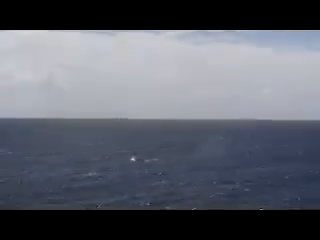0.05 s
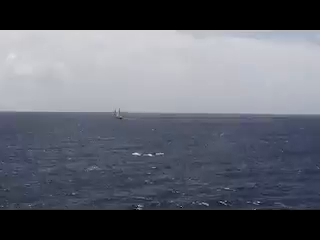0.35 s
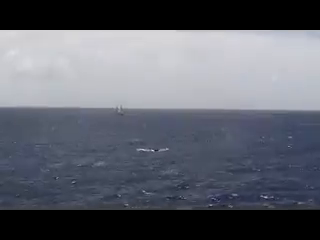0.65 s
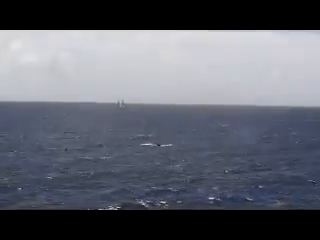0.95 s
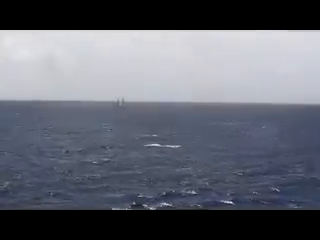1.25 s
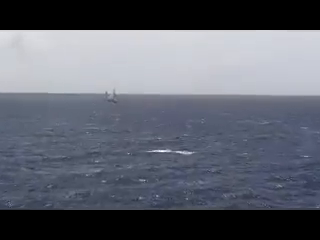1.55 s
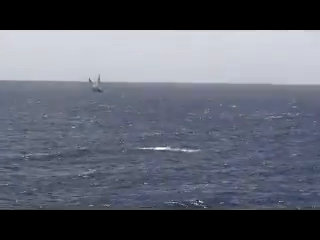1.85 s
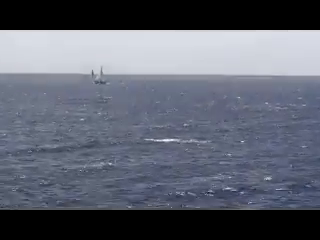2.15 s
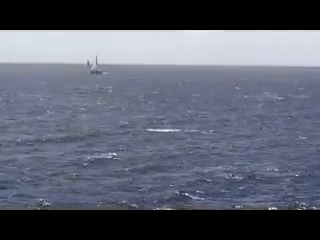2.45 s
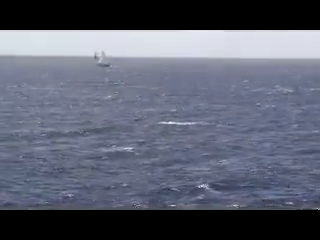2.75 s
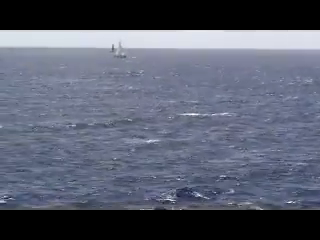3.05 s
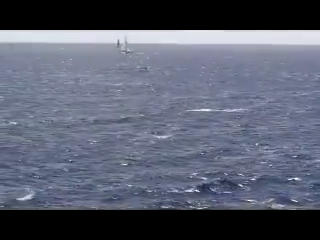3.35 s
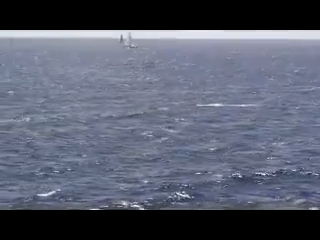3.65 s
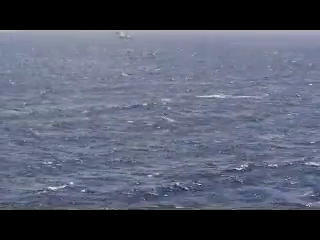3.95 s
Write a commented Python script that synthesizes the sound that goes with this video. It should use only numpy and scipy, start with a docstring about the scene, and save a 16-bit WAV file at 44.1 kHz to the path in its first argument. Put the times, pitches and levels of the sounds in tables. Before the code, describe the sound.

Gusty wind buffets the microphone with a soft rumble, sputtering rasp, crackles and occasional dull thumps. It gusts through the first second, eases around 1.3 to 2.1 seconds, then returns unevenly and crackles most from about 2.9 seconds. Far behind it are a faint sea hiss, a deep drone and tiny high camera ticks. At about 3.95 seconds a much louder, deep blast of wind hits suddenly.

```python
"""Out on open water, gusty wind buffets a camera's microphone. Eddies (small swirls of air) hit its
openings and make a soft rumble that turns into a sputtering rasp in the gusts, with spits, thumps
and crackles. Behind it the choppy sea hisses faintly over a deep drone, and something small,
probably the lens mechanism, ticks in the camera. At the very end a far stronger blast hits head-on."""
import sys
import numpy as np
from scipy import signal
from scipy.fft import rfft, irfft, next_fast_len
from scipy.io import wavfile
from scipy.ndimage import uniform_filter1d, map_coordinates

SR = 44100
rng = np.random.default_rng(int(sys.argv[2]) if len(sys.argv) > 2 else 0)


def wav_record(signal):
    """Record a signal, one row per channel, as 16-bit PCM in the file named by sys.argv[1]."""
    frames = np.transpose(np.atleast_2d(signal))
    bounded = np.clip(frames, -1, 1)
    # unit amplitude maps onto the largest positive 16-bit level
    quanta = np.round(bounded * 32767).astype(np.int16)
    wavfile.write(sys.argv[1], SR, quanta)


N = 176400  # 4 seconds

# How the wind rises and falls: time_s, rumble_db, rasp_db
GUSTS = [(0.0, -54.5, -76), (0.055, -47.5, -76), (0.07, -44.5, -66.5), (0.18, -43.5, -59.5),
         (0.21, -43, -66), (0.24, -43.5, -62), (0.59, -43, -58.5), (0.89, -46.5, -64.5), (1.04, -45, -59.5),
         (1.07, -52, -67.5), (1.16, -47.5, -60.5), (1.22, -52.5, -80), (1.3, -49, -64.5),
         (1.34, -55.5, -83), (1.4, -47, -64.5), (1.45, -61.5, -84.5), (1.49, -49, -75), (1.52, -58.5, -85),
         (1.69, -54, -83.5), (1.77, -42, -63), (1.79, -49.5, -75), (1.84, -55.5, -72.5), (1.99, -48.5, -78),
         (2.1, -52, -81), (2.16, -43, -67), (2.21, -49, -89), (2.25, -42.5, -59.5), (2.28, -47, -73.5),
         (2.36, -53.5, -69), (2.4, -52, -72.5), (2.47, -41.5, -62.5), (2.66, -53.5, -74),
         (2.7, -44.5, -62.5), (2.76, -50.5, -76.5), (2.78, -44.5, -62), (2.85, -44, -59.5),
         (3.21, -42, -59), (3.3, -47.5, -65.5), (3.32, -43, -62), (3.4, -49.5, -67.5), (3.43, -45.5, -64.5),
         (3.58, -54, -77.5), (3.62, -47, -63.5), (3.66, -52.5, -71.5), (3.7, -42, -62), (3.74, -48.5, -68),
         (3.77, -43, -61), (3.87, -44, -64.5), (3.92, -43.5, -61)]
# The tone of its low, middle and high layers: pitch_hz, level_db
RUMBLE_TONE = [(15, -7.5), (30, -11), (60, -5), (125, -1), (210, -3), (350, -6.5), (500, -13.5),
               (800, -19.5), (1500, -47.5), (4000, -84)]
FLUTTER_TONE = [(120, -35), (300, -5.5), (500, 2.5), (800, -3), (1200, -8.5), (2000, -20.5), (4000, -54),
                (9000, -69)]
RASP_TONE = [(300, -26), (800, 2.5), (1300, 4.5), (2000, 2.5), (3100, -9.5), (4600, -22), (7000, -39.5),
             (16000, -58)]
# How alike left and right sound: pitch_hz, likeness (1 the same, -1 opposite)
WIND_STEREO = [(30, 0.91), (130, 0.82), (290, 0.14), (700, -0.52), (3100, -0.28), (7000, 0.64)]
FULL_GUST_DB = -58  # gust strength is counted from this rasp level

def wind():
    """Eddies hit the microphone: stronger gusts are brighter, and the treble sputters with each eddy."""
    rumble_db, rasp_db = curves(GUSTS)
    gust_db = rasp_db - FULL_GUST_DB
    unrest = np.clip(.85 - 0.02 * gust_db, .3, 1.5)  # a stronger gust is steadier
    eddies = unit(np.tanh(1.9 * wobble(per_s=72))) * unrest
    buffets = np.tanh(wobble(per_s=48)) * unrest  # larger eddies
    sputter = wobble(per_s=330)
    rumble = even(noise(RUMBLE_TONE, WIND_STEREO), samples=1800)
    rumble *= amp(rumble_db + 2.08 + 1.3 * eddies)
    flutter_swing = amp(2.2 * eddies + 1.4 * buffets + 3.9 * sputter)
    flutter = even(flutter_swing * noise(FLUTTER_TONE, WIND_STEREO), samples=8000)
    rasp_swing = amp(eddies + 4 * sputter + 3.5 * wobble(per_s=1800))
    rasp = even(rasp_swing * noise(RASP_TONE, WIND_STEREO), samples=6000)
    flutter *= amp(FULL_GUST_DB + 11 + 0.85 * gust_db)
    rasp *= amp(FULL_GUST_DB + 1.31 * gust_db)  # grows faster than the flutter
    return rumble + flutter + rasp


# Sharp eddies hitting the microphone: peak_s, level_db
SPIT_HITS = [(0.1705, -59), (0.2185, -56), (0.3185, -47.5), (0.3368, -50), (0.415, -49.5), (0.4285, -51),
             (0.441, -51), (0.47, -51), (0.501, -47), (0.5823, -49), (0.5956, -50), (0.623, -45.5),
             (0.6435, -52.5), (0.7166, -52.5), (0.8102, -50), (0.852, -53.5), (0.9054, -50), (0.912, -54.5),
             (0.959, -52), (0.993, -51), (1.116, -54.5), (1.1504, -59), (1.3738, -65), (1.4049, -53),
             (2.263, -64), (2.891, -52.5), (2.986, -48), (2.994, -49.5), (3.014, -46.5), (3.0242, -49),
             (3.073, -53.5), (3.0812, -49.5), (3.1363, -48), (3.148, -55), (3.1875, -51), (3.217, -50.5),
             (3.2485, -51.5), (3.279, -52), (3.409, -54), (3.4344, -53.5), (3.6892, -60), (3.7027, -63),
             (3.797, -61), (3.8452, -54), (3.889, -53.5)]
# The tone of a spit, and the extra fizz of the hardest ones: pitch_hz, level_db
SPIT_TONE = [(450, -9), (1300, 4.5), (3100, -3), (4600, -17), (7000, -44), (16000, -55)]
FIZZ_TONE = [(2500, -4.5), (4500, 3), (10500, -12), (16000, -50)]

def spits():
    """Sharp eddies make short, gritty puffs, mostly in the gusts; the harder, the brighter."""
    typical_db = -50
    swell = puffs([(s, db - typical_db, 0.0066) for s, db in SPIT_HITS], rise_s=0.001)
    grit = amp(3.2 * wobble(per_s=900))
    body = even(grit * noise(SPIT_TONE, WIND_STEREO), samples=300)
    fizz = even(grit * noise(FIZZ_TONE, WIND_STEREO), samples=300)
    return amp(typical_db) * (amp(-2) * swell * body + amp(-14) * swell ** 2.4 * fizz)


def crackle():
    """Tiny eddies snap on the microphone; a stronger gust brings more and louder snaps."""
    _, rasp_db = curves(GUSTS)
    gust = amp(rasp_db - FULL_GUST_DB)
    snaps_per_s = 200 * gust ** 2
    snaps = (rng.random(N) < snaps_per_s / SR) * rng.uniform(.5, 1, N)
    age = np.arange(SR // 50) / (.00045 * SR)  # reaches 1 at the snap's peak
    swell = signal.fftconvolve(snaps, age ** 2 * np.exp(2 * (1 - age)))[:N]
    return amp(-54) * gust * swell * noise(SPIT_TONE, WIND_STEREO)


# Big eddies hitting the microphone: peak_s, level_db
THUMP_HITS = [(0.061, -42), (0.902, -39.5), (1.283, -46), (1.375, -49), (2.02, -42.5), (2.167, -47),
              (2.239, -42.5), (2.34, -42.5), (2.352, -43.5), (2.381, -53), (2.89, -41), (3.612, -52),
              (3.687, -42), (3.845, -40.5)]
# Their dull tone: pitch_hz, level_db
THUMP_TONE = [(100, -10), (220, 4), (360, 1.5), (600, -7), (1200, -21), (3000, -62)]

def thumps():
    """Big eddies land as separate dull knocks."""
    swell = puffs([(s, db, 0.013) for s, db in THUMP_HITS], rise_s=0.0031)
    return amp(2) * swell * even(noise(THUMP_TONE, WIND_STEREO), samples=400)


# The blast's heavy swings of air pressure: pitch_hz, width_hz, level_db, build_s
PRESSURE_SWINGS = [(69, 15, -10, 0.04), (132.6, 41, -15, .003), (196.6, 79, -18.5, 0.0017)]
# The tone of its deep body and of its tearing edge: pitch_hz, level_db
BLAST_TONE = [(30, 2), (95, -1), (215, -10), (310, 1), (480, -12), (900, -22.5), (1400, -26.5), (3500, -75)]
TEAR_TONE = [(500, -2), (1400, -2.5), (2800, -8), (5000, -20), (8000, -29), (15000, -36)]
# How alike left and right sound: pitch_hz, likeness
BLAST_STEREO = [(40, 0.69), (700, 0.11)]

def blast(start_s=3.9505, rise_s=0.0021, crack_s=0.00051, tear_fade_db_per_s=213):
    """Wind hits head-on: a crack, pressure swings that build and hold, and a ragged tear that fades."""
    age = np.maximum(np.arange(N) / SR - start_s, 0)
    swings = 0
    for hz, width, db, build_s in PRESSURE_SWINGS:
        band = [(hz / (1 + 2 * width / hz), -30), (hz, 0), (hz + 2 * width, -30),
                (hz + 10 * width, -120)]
        swing = even(noise(band, [(100, 0.91)]), samples=700)
        swings += amp(db) * np.minimum(age / build_s, 1) * swing
    body = amp(-16) * even(noise(BLAST_TONE, BLAST_STEREO), samples=700)
    tear = even(amp(3 * wobble(per_s=450)) * noise(TEAR_TONE, BLAST_STEREO), samples=600)
    tear *= amp(-25 - tear_fade_db_per_s * age)
    crack = puffs([(start_s + crack_s, -32, crack_s)], crack_s) * noise(TEAR_TONE, BLAST_STEREO)
    fade_in = np.clip(age / rise_s, 0, 1)
    fade_out = np.minimum(np.arange(N)[::-1] / 60, 1)  # the last 60 samples
    return crack + fade_in * fade_out * (swings + body + tear)


# Ticks inside the camera: peak_s, level_db
CAMERA_TICKS = [(1.008, -71), (1.028, -74), (1.087, -72), (1.265, -74.5), (1.763, -70), (1.888, -72),
                (2.108, -71), (2.379, -73), (2.41, -68.5), (2.552, -73), (2.618, -64.5), (2.912, -71),
                (3.091, -70), (3.329, -70), (3.498, -71), (3.58, -74), (3.679, -77)]
# The tone of their high ring: pitch_hz, level_db
RING_TONE = [(3000, -28), (7750, -23), (8150, 4), (8400, 0), (8800, -16), (11800, -17), (16000, -32)]

def ticks(ring_fade_s=0.0041, click_s=0.001, chatter_from_s=1.6):
    """A small part in the camera clicks and rings briefly; a very faint chatter joins in partway."""
    rings = puffs([(s, db - 1, ring_fade_s) for s, db in CAMERA_TICKS], rise_s=0.0014)
    clicks = puffs([(s, db - 3, click_s) for s, db in CAMERA_TICKS], rise_s=click_s)
    chatter = amp(-92) * unit(amp(8 * wobble(per_s=70))) * (np.arange(N) / SR > chatter_from_s)
    ring_noise = even(noise(RING_TONE, [(8000, 0.94)]), samples=300)
    click_noise = noise([(2000, -6), (6000, 5), (15000, -14)], [(8000, .9)])
    return (rings + chatter) * ring_noise + clicks * click_noise


# How the sea's hiss rises and falls: time_s, level_db
SEA_LEVELS = [(0, -78), (1.2, -81.5), (1.55, -80.5), (2.2, -75.5), (2.75, -76), (3.9, -81)]
# Its tone: pitch_hz, level_db
SEA_TONE = [(300, -0.5), (1000, 4.5), (2000, 7), (2800, 3), (4500, -3), (7000, -5), (9800, -5),
            (12000, -14), (15500, -30)]

def sea():
    """Choppy water makes a faint, smooth hiss."""
    level_db, = curves(SEA_LEVELS)
    swell = amp(level_db + 1.5 + 0.35 * wobble(per_s=19))
    hiss = noise(SEA_TONE, [(1000, 0.86), (9000, 0.48)])
    return swell * hiss * amp([[.8], [-.8]])  # a little louder on the left


# The tone of the deep background: pitch_hz, level_db
DRONE_TONE = [(30, -11), (105, 1), (170, -21.5), (1000, -80)]

def drone():
    """A faint, deep drone comes through when the wind drops."""
    return amp(-57) * noise(DRONE_TONE, WIND_STEREO)


def amp(db):
    """Turn decibels into a number to multiply a sound by."""
    return 10 ** (np.asarray(db) / 20)


def unit(x):
    """Scale a signal so that its average strength (rms) is 1."""
    return x / np.sqrt(np.mean(x ** 2) + 1e-20)


def along(points, hz):
    """Read between (pitch_hz, value) points, with octaves about evenly spaced."""
    pitches, values = np.transpose(points)
    return np.interp(np.log(hz + 1), np.log(pitches + 1), values)


def curves(rows):
    """Join the dots of a timed table: one curve for each column after time_s."""
    times, *columns = np.transpose(rows)
    return [np.interp(np.arange(N) / SR, times, column) for column in columns]


def wobble(per_s):
    """A smooth curve through per_s random values each second."""
    return map_coordinates(rng.standard_normal(N // 8), [np.arange(N) * per_s / SR], mode="wrap")


def noise(tone, stereo):
    """Stereo noise of strength 1, shaped by (pitch_hz, level_db) and (pitch_hz, likeness) points."""
    size = next_fast_len(N + SR // 2)
    hz = np.fft.rfftfreq(size, 1 / SR)
    spread = np.arccos(np.clip(along(stereo, hz), -.99, .99)) / 2
    gains = amp(along(tone, hz)) * [np.cos(spread), np.sin(spread)]
    white = rng.standard_normal((2, N))
    shared, opposite = irfft(rfft(white, size) * gains, size)[..., :N]
    return unit(np.array([shared + opposite, shared - opposite]))


def even(x, samples):
    """Even out swells that last longer than this many samples."""
    power = uniform_filter1d(np.mean(x ** 2, axis=0), samples)
    return x / np.sqrt(np.abs(power) + 1e-9)


def puffs(events, rise_s):
    """A loudness curve that jumps up and dies away for each (peak_s, level_db, fade_s)."""
    swell = np.zeros(N + SR)
    age = np.arange(SR // 8) / SR - .01  # seconds since the peak
    rise = np.clip(age / rise_s + 1, 0, 1)
    for peak_s, db, fade_s in events:
        start = round((peak_s + age[0]) * SR)
        swell[start:start + len(age)] += amp(db) * rise * np.exp(-np.maximum(age, 0) / fade_s)
    return swell[:N]


def scene():
    """Wind in front, with sea, drone and ticks far below it, and the blast to finish."""
    return wind() + thumps() + spits() + crackle() + sea() + drone() + ticks() + blast()


def record(dry):
    """The camera rounds off the highest peaks and cuts the very highest treble."""
    ceiling, top_hz = .95, 16000
    rounded = dry / (1 + np.abs(dry / ceiling) ** 8) ** (1 / 8)
    return signal.sosfilt(signal.cheby1(14, .1, top_hz, fs=SR, output="sos"), rounded)


dry = scene()
out = record(dry)
wav_record(out)
```